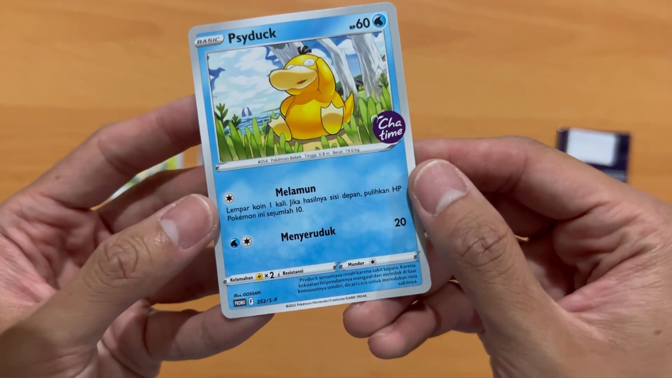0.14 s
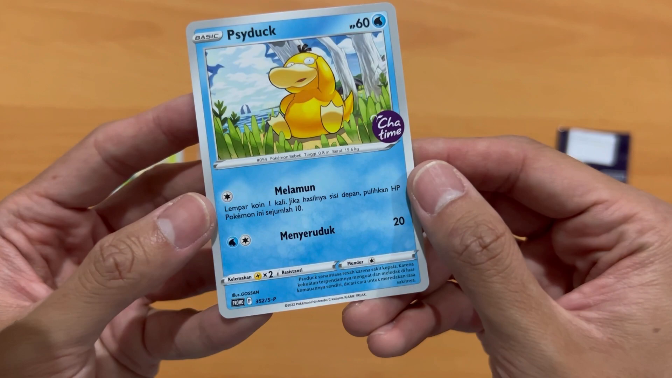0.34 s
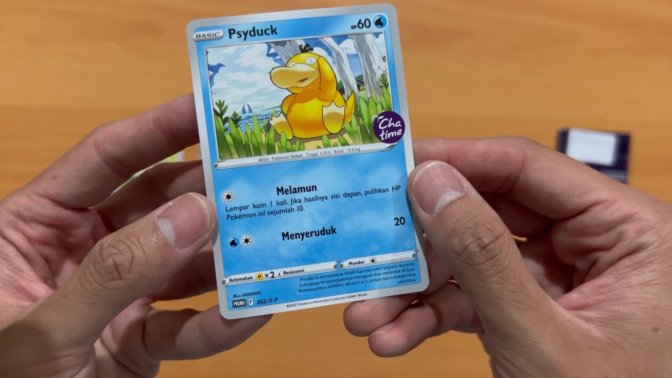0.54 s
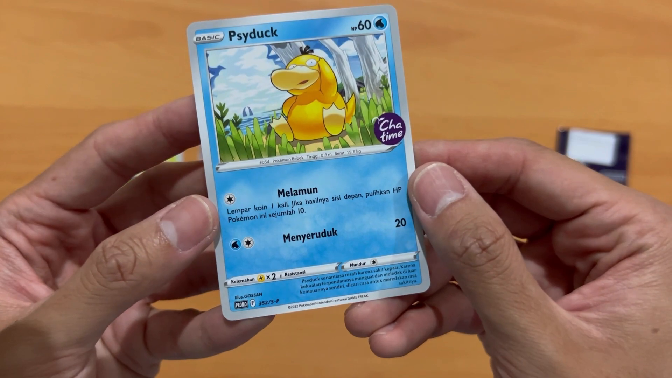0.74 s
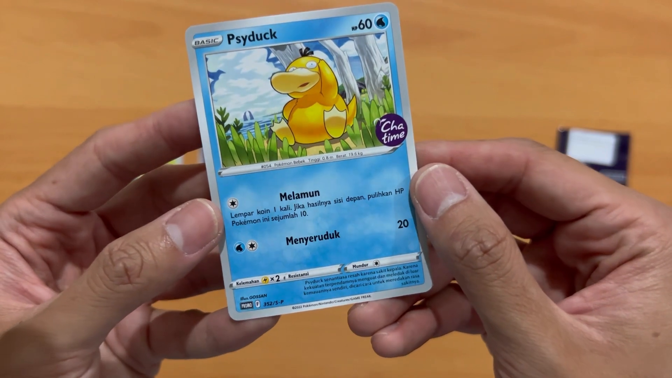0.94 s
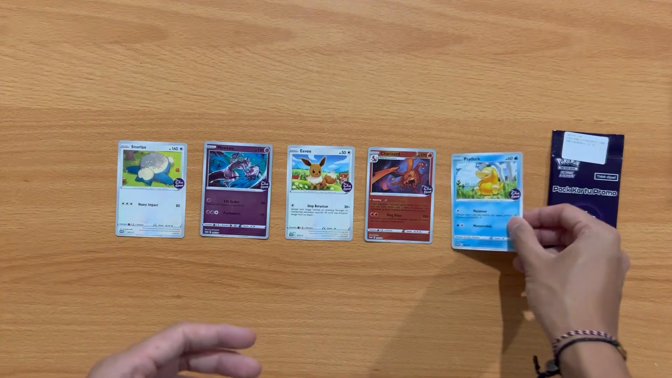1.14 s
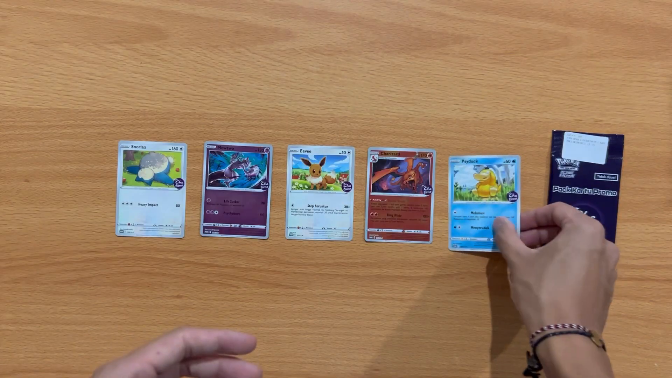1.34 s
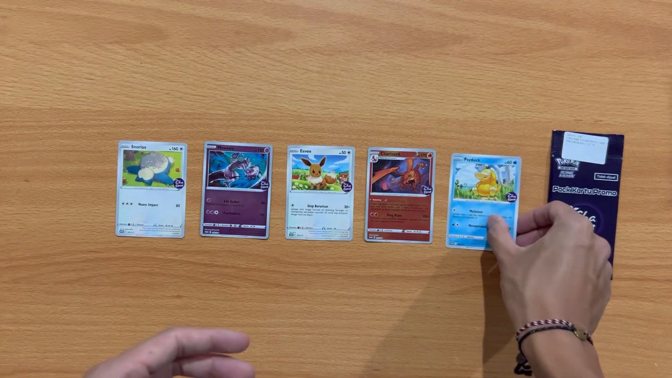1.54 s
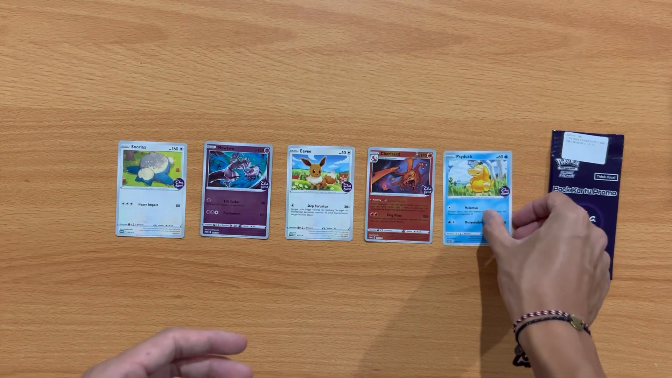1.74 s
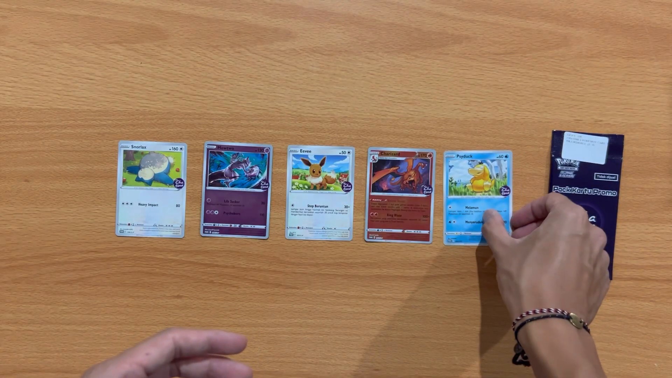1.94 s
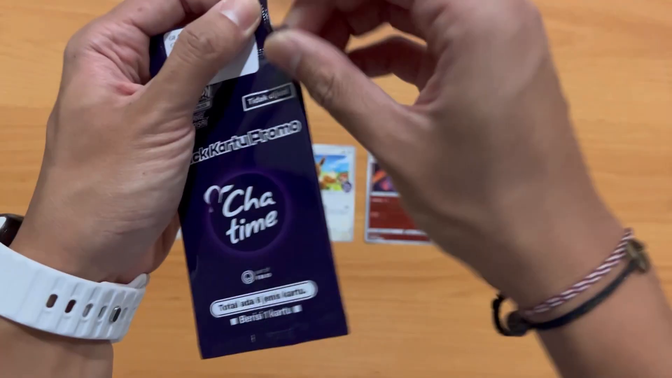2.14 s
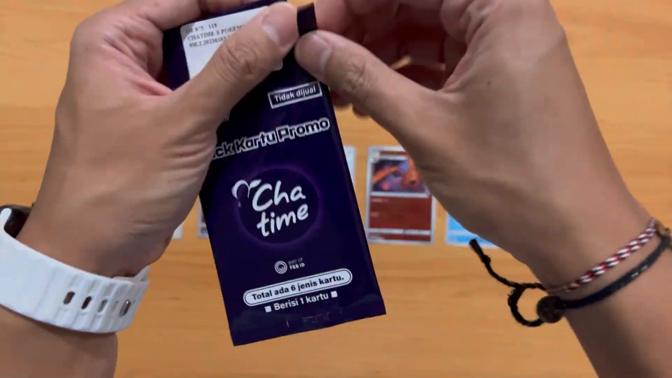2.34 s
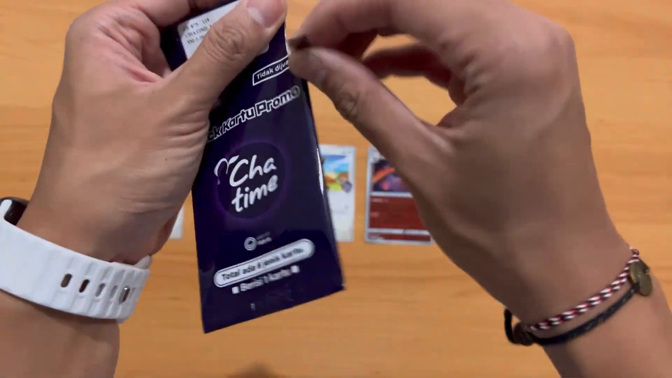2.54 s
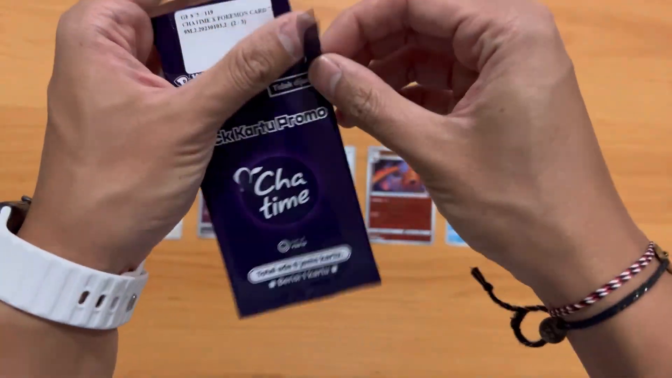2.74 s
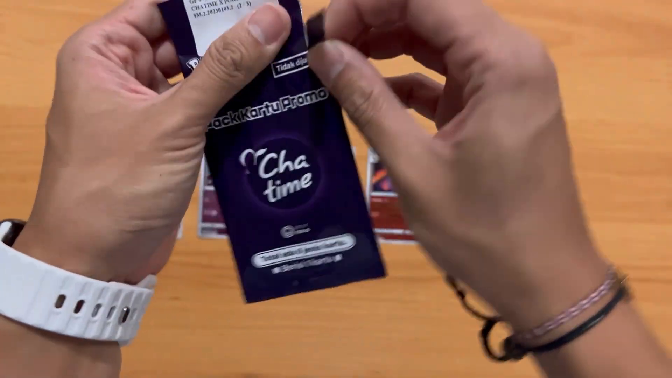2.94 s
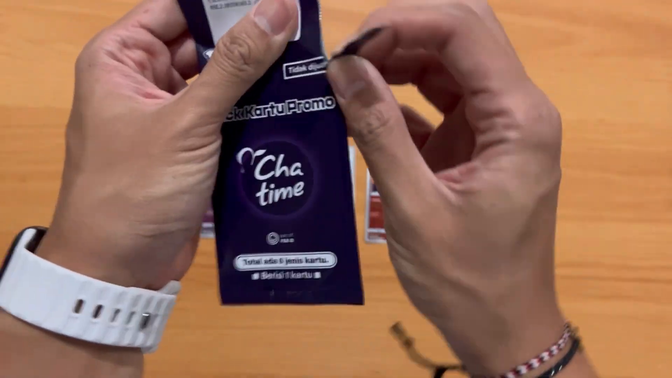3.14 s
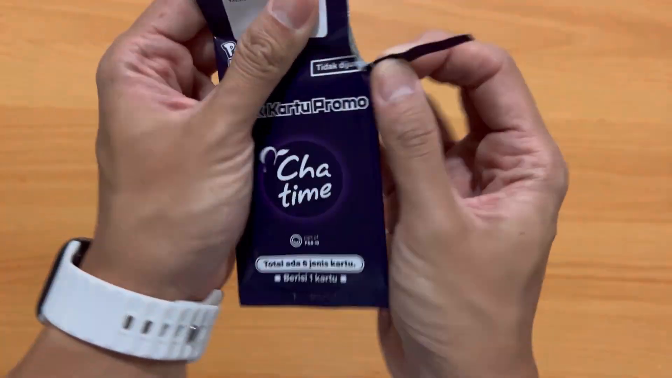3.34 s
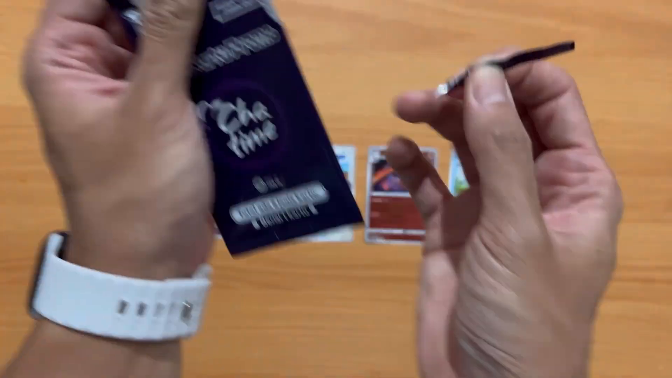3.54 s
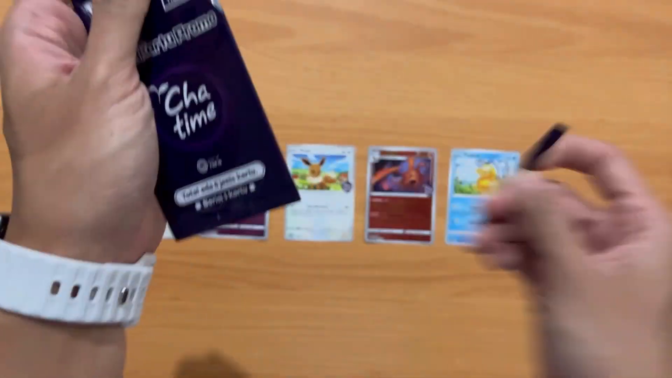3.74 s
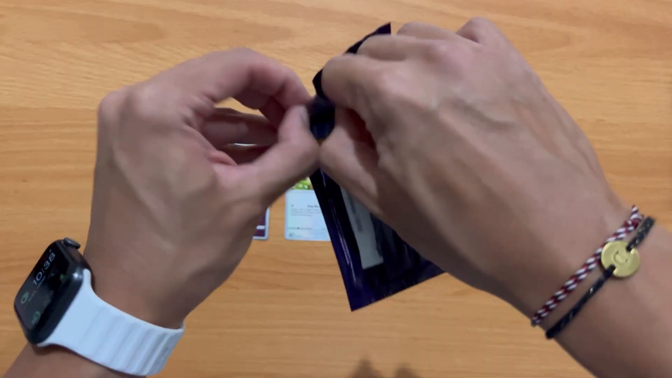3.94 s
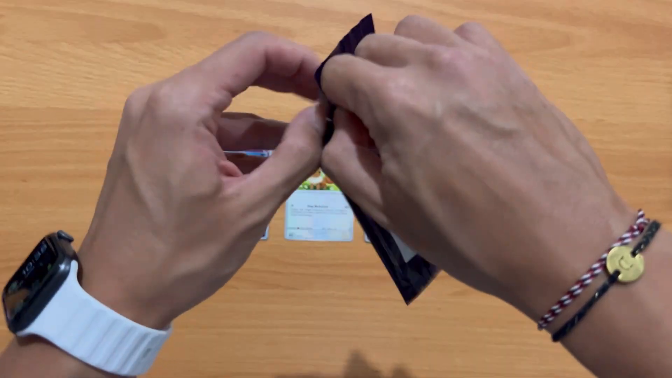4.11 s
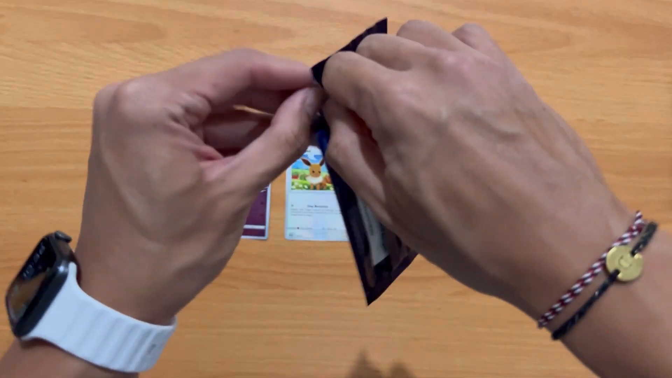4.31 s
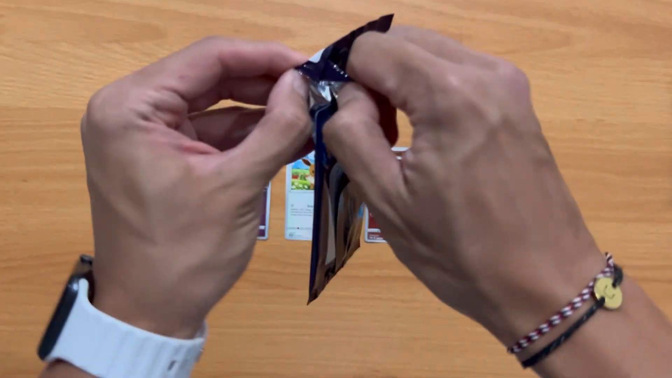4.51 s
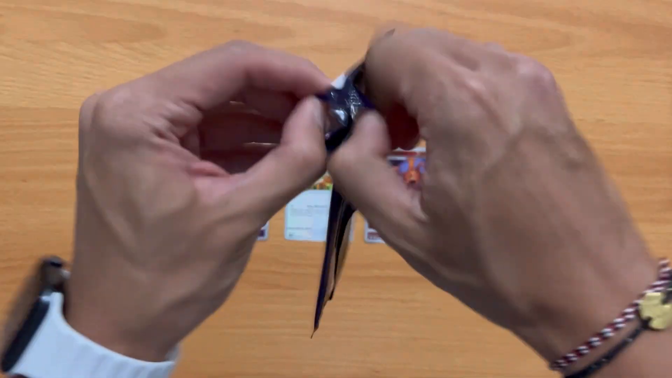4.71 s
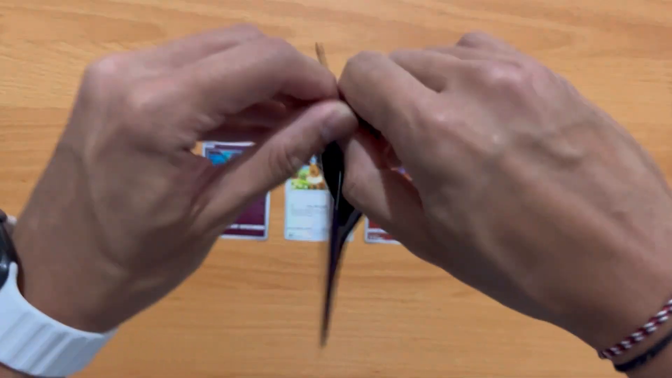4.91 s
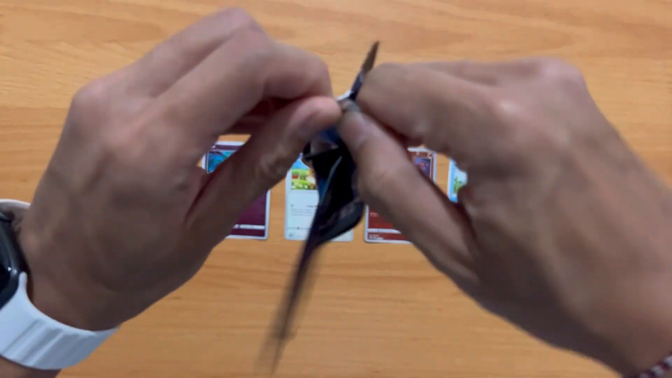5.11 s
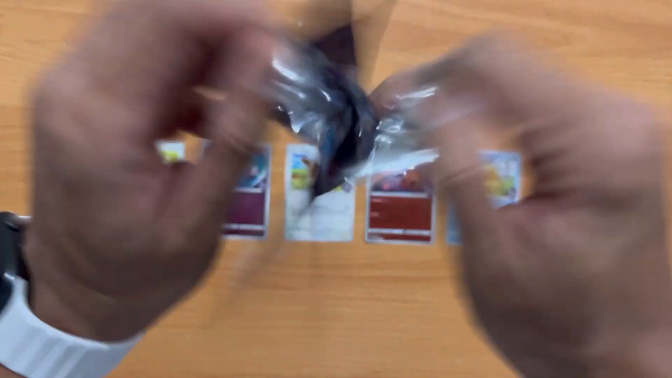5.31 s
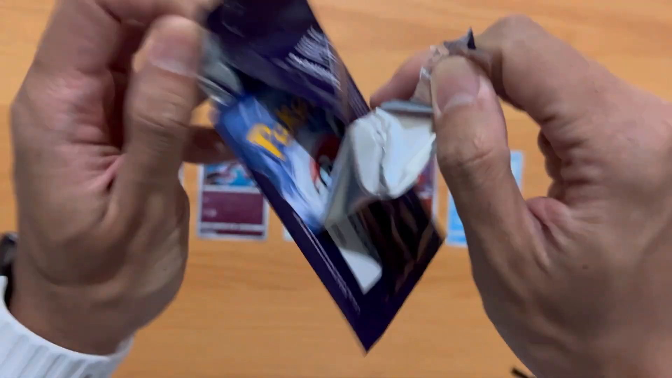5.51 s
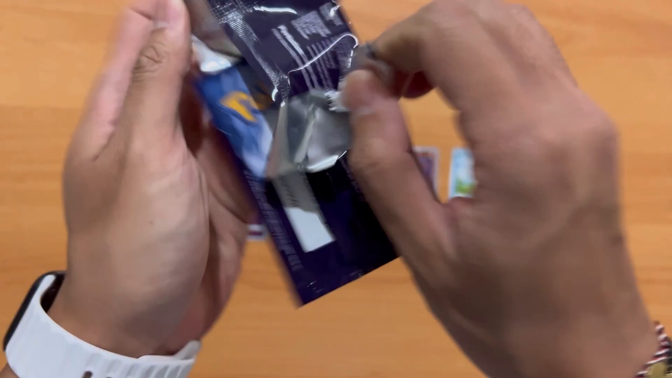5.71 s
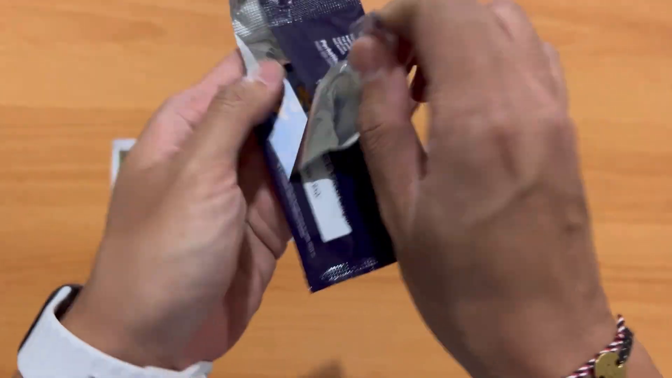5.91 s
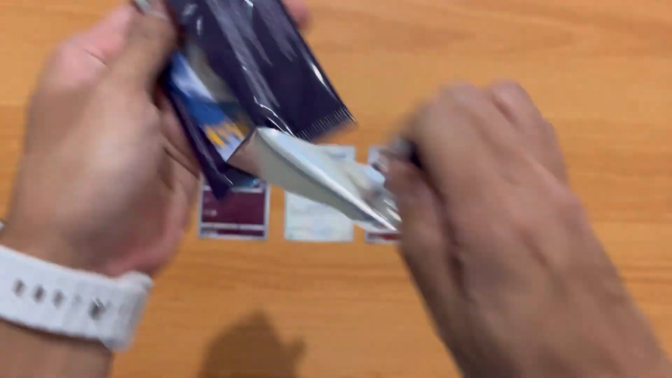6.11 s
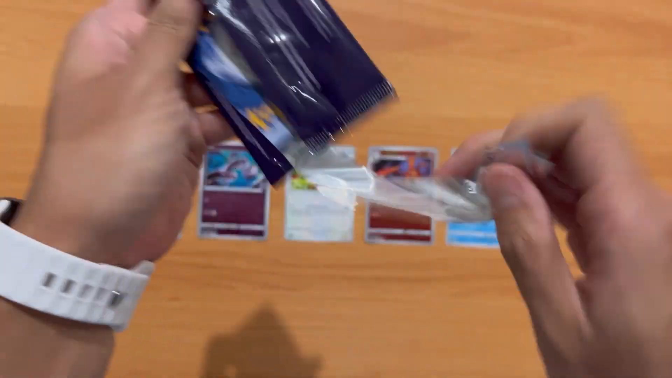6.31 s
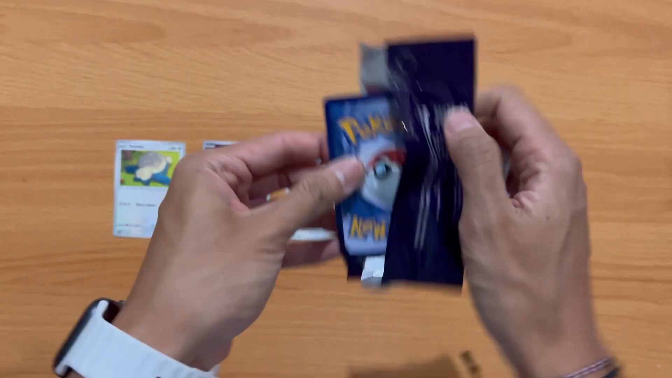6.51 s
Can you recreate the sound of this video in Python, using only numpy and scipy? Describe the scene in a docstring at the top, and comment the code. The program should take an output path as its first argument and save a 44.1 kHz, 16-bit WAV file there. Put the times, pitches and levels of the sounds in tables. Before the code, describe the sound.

Close stereo pickup above a wooden table in a bare room. Soft hum first, then a barely audible card scrape and small flick. Stiff plastic film starts to crackle under fingers, sparse at first, then harder and snappier, with dull flaps of the pouch. A dense rip bursts out, a short lull follows, then vigorous crinkling as a strip comes away. Outside, low traffic rumble and a small engine's distant drone.

```python
"""A bare, quiet room: close by, above a wooden table, hands tear a plastic foil packet open.
Hum comes first; then filtered noise makes a card slide on the table, and random fractures and ringing
creases make the packet crinkle. Its seam gives in one sharp rip, a dense burst of fractures, and the loose
strip is pulled off. Far outside, harmonics of a firing rate make a small engine drone by over street noise.
"""
import sys
import numpy as np
from scipy import signal
from scipy.fft import rfft, irfft, next_fast_len
from scipy.io import wavfile

SR = 44100
rng = np.random.default_rng(int(sys.argv[2]) if len(sys.argv) > 2 else 0)


def dump(signal):
    """Clip the signal to [-1, 1] and save it as 16-bit WAV at the path in sys.argv[1]."""
    limited = np.clip(np.atleast_2d(signal).T, -1, 1)
    pcm = np.round(limited * 32767).astype(np.int16)
    wavfile.write(sys.argv[1], SR, pcm)


N = 293706

# Spectra below are shapes: each sound is scaled to rms 1 before its own level is applied.
# room hum at first: (f/Hz, density/dB per Hz)
HUM_SPECTRUM = [(70, -5.5), (108, 1.5), (160, -13.5), (300, -15), (500, -26), (780, -30.5), (1260, -25),
                (2350, -37.5), (3600, -50), (16000, -67)]
# room air afterwards: (f/Hz, density/dB per Hz)
AIR_SPECTRUM = [(100, 16), (500, -11), (1600, 5.5), (3000, -14), (8000, -41), (12000, -29), (16000, -14)]
# a thin steady whine in the room: (f/Hz, density/dB per Hz)
WHINE_SPECTRUM = [(3700, -57), (4110, -21), (4195, 8), (4290, -29), (4700, -53)]
HUM_DB, HUM_RUMBLE_DB = -57, -55  # the hum and the rumble under it
HUM_END_S, HUM_HANDOVER_S = 1.1, .02  # middle and duration of the passage from hum to thinner air
AIR_DB, AIR_RISE_DB_PER_S = -76.5, 1.9  # level at HUM_END_S and its steady rise

# street outside, before the overall gains: (t/s, rumble level/dB, drone level/dB)
STREET_LEVELS = [(1.12, -65, -72.5), (1.52, -68.5, -77.5), (2.12, -61.5, -75.5), (2.54, -55, -67),
                 (3.16, -60.5, -67.5), (3.19, -52.5, -69), (3.82, -50, -67), (4.19, -49.5, -56.5),
                 (4.65, -52.5, -59.5), (5.87, -47, -57.5), (6.66, -57.5, -56.5)]
# street rumble, also used under the hum: (f/Hz, density/dB per Hz)
RUMBLE_SPECTRUM = [(15, -46), (28, -9), (40, 15), (49, 14), (58, 23.5), (68, 7), (85, 0), (130, -43)]
# street drone: (f/Hz, density/dB per Hz)
DRONE_SPECTRUM = [(60, -21), (105, 2), (140, -3), (195, -1), (270, -8), (400, -13.5), (700, -26.5),
                  (1500, -32.5)]

# the card is pushed over the wood: (start t/s, length t/s, level/dB, brightness/dB per octave)
CARD_PUSHES = [(1.097, 0.19, -75, -5.5), (1.444, 0.29, -77.5, 2)]
# card on wood, before the brightness tilt: (f/Hz, density/dB per Hz)
CARD_SPECTRUM = [(1200, -14), (2200, 2), (3300, -7), (4000, -1), (4300, 7), (4700, -6.5), (9000, -29),
                 (12000, -12), (16000, -13)]
# card edge slipping from the finger: (f/Hz, density/dB per Hz)
EDGE_SPECTRUM = [(2000, -16), (4300, -11), (6000, 7), (8000, -11), (12000, -11), (16000, -11)]
PUSH_ATTACK_S, PUSH_RELEASE_S = .08, .04
FLICK_S, FLICK_DB, FLICK_FADE_S = 1.717, -52, 0.0066  # the finger slips off the edge

# fingers take hold and work the film: (start t/s, length t/s, effort level/dB before the layer gain)
FINGER_GRIPS = [(2.129, 0.081, -50.5), (2.37, .13, -50.5), (2.58, 0.44, -59), (3.109, 0.065, -55),
                (3.429, .05, -52), (3.869, 0.31, -46), (4.289, 0.2, -45), (4.531, 0.23, -49.5),
                (4.791, .2, -49), (5.07, .16, -48.5), (5.33, 0.14, -49), (5.6, .12, -47),
                (5.88, 0.096, -48.5), (6.019, .18, -43), (6.298, 0.32, -51)]
# film slides on film: (centre t/s, half length t/s, level/dB before the layer gain)
FILM_RUBS = [(3.47, 0.011, -45), (3.905, 0.02, -51), (3.936, 0.044, -39.5), (4.358, 0.029, -39.5),
             (4.457, 0.012, -42.5), (4.85, 0.011, -41.5), (5.174, 0.022, -41), (5.972, 0.044, -44),
             (6.081, 0.022, -34.5), (6.2, 0.013, -39.5), (6.317, 0.019, -45)]
# fine crackle: (f/Hz, density/dB per Hz)
FILM_SPECTRUM = [(150, 2.5), (400, -4), (1000, 0), (3000, 4), (6000, -3.5), (9500, 1.5), (12000, -1),
                 (16000, -7.5)]
GRIP_ATTACK_S, GRIP_RELEASE_S = .02, 0.028
RIP_S, RIP_LENGTH_S, RIP_DB = 5.272, .06, -24  # the seam parts
RIP_ATTACK_S, RIP_RELEASE_S = 0.02, .015  # the tear gathers speed, then runs out

# loudest creases buckling:
# (t/s, level/dB before the layer gain, thud over crack level/dB, fizz over crack level/dB)
CREASES = [(2.1346, -44, -10.5, -21), (2.1788, -39, -6.5, -6), (2.1872, -42.5, -5, 2),
           (2.1966, -39.5, -13, -13), (2.2177, -35.5, -5, -2), (2.3765, -35, -16, -10),
           (2.4131, -34.5, -9.5, 5), (2.4372, -31.5, -11, 4.5), (2.4815, -40, -7, 3),
           (2.5606, -37, -12, 13), (2.5995, -41, -8.5, -6.5), (2.6524, -42.0, -5, -14),
           (2.7064, -43.5, -14, 4), (2.7343, -34, -18, 1.5), (2.8547, -41.5, -3, 1),
           (2.9521, -41.5, -16, -16), (2.9849, -43.5, -6, -9), (3.039, -27.5, -16, 1.5),
           (3.0974, -35.5, -2, 15), (3.1512, -32.5, -20, 12.5), (3.3087, -49, -5.5, -10),
           (3.357, -47.5, 3.5, -6), (3.4127, -25.5, -6, 12.5), (3.4315, -24.5, -10, 15),
           (3.4677, -38, 3.5, -1), (3.4737, -31.5, -4.5, -3), (3.6841, -43.5, -5.5, 5),
           (3.9046, -32.5, -11, 4.5), (3.9192, -22.0, -15, 12.5), (3.939, -22.5, -18, 1.5),
           (4.0703, -30.5, -4, 4), (4.0832, -32.5, -23, -3), (4.2995, -26.5, -4, 17.5),
           (4.332, -24.5, -18, 8.5), (4.3508, -29.0, -15, 5), (4.3611, -28.5, -21, 4),
           (4.4026, -34.5, -10, 13), (4.4652, -28.5, -17, 9), (4.5801, -31.5, -5, 16),
           (4.6612, -37.0, -7, -1), (4.676, -33, -8.5, -2), (4.7125, -31, -4.5, 4),
           (4.8299, -32.5, -7.5, 0.5), (4.9316, -35.5, -3, 14), (5.0439, -39, 1, 16),
           (5.1039, -38, -15, -1), (5.1138, -36, -3.5, 6), (5.1335, -30.5, -6, 14), (5.1705, -28, -8, 19),
           (5.1939, -35, -15, -2), (5.2845, -20.5, -8, 2), (5.2936, -18.5, -15.5, -14),
           (5.3036, -16.5, -13, 2), (5.3134, -21, -6, 5), (5.3234, -20, -8, -4), (5.329, -18, -7.5, -2.5),
           (5.3609, -28, -5, -5), (5.4433, -30, -15, -4), (5.6836, -39.5, -2, -4.5), (5.882, -32.5, -2, 11),
           (5.9211, -34.5, -10, -10), (6.0202, -27, -16, -2), (6.0485, -24, -16, -1),
           (6.0569, -26.5, -13, 4), (6.0654, -23, -8, 1), (6.0838, -19.5, -7, 3), (6.125, -21.5, -7.5, 1.5),
           (6.1643, -27.5, 1.5, 2), (6.2057, -23.5, -7, 13), (6.3405, -34, -4, 8),
           (6.4398, -35.0, -15.5, -3), (6.4736, -40, 2, -1), (6.5631, -37.0, -3.5, -7),
           (6.6534, -25.0, -10, 5.5)]
# thud, crack and fizz of a crease: (low f/Hz, high f/Hz, facet decay t60/s)
CREASE_BANDS = [(257, 1351, 0.016), (1272, 6745, 0.011), (7440, 15160, 0.012)]
TICK_DB, TICK_SCATTER_DB = 3, 3  # lesser creases: strength over the effort, and its spread
TICK_THUD_DB, TICK_FIZZ_DB, TICK_COLOUR_DB = -8, 5, 7.5  # thud and fizz over crack; spread of both

# the whole packet jerks: (t/s, level/dB before the envelope)
PACKET_JERKS = [(2.498, -41.5), (2.618, -46.5), (2.848, -47), (3.468, -33.5), (4.068, -39.5), (5.31, -36.5),
                (5.33, -27), (6.085, -44), (6.128, -41), (6.167, -33.5), (6.562, -36)]
# its dull flap: (f/Hz, density/dB per Hz)
POUCH_SPECTRUM = [(40, 5), (120, 6), (300, 4.5), (450, 6.5), (900, -59), (2500, -47)]

# the far engine: (t/s, firing rate f/Hz, level/dB)
ENGINE_PASS = [(3.8, 31.1, -73), (3.97, 31.5, -48.5), (4.4, 31.7, -58.5), (4.9, 32.9, -50), (5.7, 34, -51),
               (6.2, 34.45, -45), (6.66, 34.5, -47)]
# resonances that shape the exhaust as heard indoors: (f/Hz, level/dB)
EXHAUST_RESPONSE = [(30, -32), (67, -2.5), (100, -43), (135, -44), (162, -15), (172, 0.5), (186, -6.5),
                    (197, 4), (208, -5.5), (240, -6), (275, -15), (310, -7), (400, -18), (600, -27)]

# sound scattered off the hands, against the direct sound: (f/Hz, level/dB)
SCATTER_RESPONSE = [(100, -12), (500, -8), (1500, -6), (3300, -5), (5000, -1), (7000, -7), (9500, -13),
                    (16000, -11)]
# reverberation before the early boost: (f/Hz, t60/s)
ROOM_DECAY = [(200, 0.91), (600, 0.7), (1500, 1.6), (4000, 1.05), (10000, 0.95), (16000, 0.23)]
# colour of the echo: (f/Hz, level/dB)
WALL_RESPONSE = [(150, 7), (700, 4), (2500, 2.5), (5000, 7), (7500, 6), (9000, 0.5), (12000, -0.5),
                 (16000, 5)]
# diffuse field at the two ports: (f/Hz, left-right correlation)
PORT_CORRELATION = [(100, .9), (1500, .6), (3300, .45), (5000, 0), (7000, .45), (9300, .88), (12000, .88),
                    (15000, .7)]

# resonances of the microphone ports: (f/Hz, level/dB)
PORT_RESONANCES = [(7500, 0), (9400, -6), (11800, 2.5), (14200, 0), (15500, 1.5)]
# phase by which left leads right: (f/Hz, phase/rad)
PORT_PHASE = [(20, 0), (2000, -.3), (4000, -1.1), (6000, 0), (7600, .4), (8400, 1.3), (9400, 3.1),
              (12000, 6.3), (14200, 9.4), (16000, 11.1)]
# left over right: (f/Hz, level difference/dB)
PORT_BALANCE = [(60, 2.5), (200, -3), (600, -2), (2500, -1.5), (4500, -2.5), (7000, -2.5), (10000, -1),
                (16000, 1)]
TOP_HZ = 16400  # band limit
CEILING = .8  # peaks are rounded off towards this share of full scale


def amp(db):
    """Level definition: decibels to amplitude gain."""
    return 10 ** (np.asarray(db) / 20)


def unit(x):
    """Normalisation: scale a signal to rms 1."""
    return x / np.sqrt(np.mean(x ** 2) + 1e-20)


def along(points, hz):
    """Interpolation of (f/Hz, value) points on a logarithmic frequency axis."""
    f, v = np.transpose(points)
    return np.interp(np.log(hz + 1), np.log(f + 1), v)


def level(rows, axis=1):
    """Level history: one gain per sample from a dB column, all but silent outside its rows."""
    rows = np.asarray(rows)
    return amp(np.interp(np.arange(N) / SR, rows[:, 0], rows[:, axis], left=-120, right=-120))


def strokes(rows, attack_s, release_s):
    """Motion envelope: (start s, length s, dB) moves that each rise, hold and die away exponentially."""
    t = np.arange(N) / SR
    gain = np.zeros(N)
    for s, length, db in rows:
        rise = np.clip((t - s) / attack_s, 0, 1)
        gain += amp(db) * rise * np.exp(-np.maximum(t - s - length, 0) / release_s)
    return gain


def filtered(x, response):
    """Linear filtering: multiply the spectrum of x by a response of frequency."""
    n = x.shape[-1]
    padded = next_fast_len(n + 8192)
    hz = np.fft.rfftfreq(padded, 1 / SR)
    return irfft(rfft(x, padded) * response(hz), padded)[..., :n]


def coloured(x, spectrum):
    """Spectral shaping: x given a spectrum, at rms 1."""
    return unit(filtered(x, lambda hz: amp(along(spectrum, hz))))


def diffuse(pair):
    """Diffuse-field coherence: two unrelated signals mixed to the correlation found at the two ports."""
    def rotation(hz):
        angle = np.arccos(np.clip(along(PORT_CORRELATION, hz), -1, 1)) / 2
        return np.array([np.cos(angle), np.sin(angle)])
    mid, side = filtered(pair, rotation)
    return np.array([mid + side, mid - side])


def rush(spectrum):
    """Stationary diffuse noise in stereo, at rms 1."""
    return coloured(diffuse(rng.standard_normal((2, N))), spectrum)


def add(track, s, sound):
    """Superposition: mix a sound into the track at s seconds."""
    start = max(round(s * SR), 0)
    part = track[..., start:start + sound.shape[-1]]
    part += sound[..., :part.shape[-1]]


def background(rumble_db, drone_db, whine_db):
    """Noise fields: hum at first; then street rumble through the walls, and air with its whine."""
    since = np.arange(N) / SR - HUM_END_S
    air_share = np.clip(since / HUM_HANDOVER_S + .5, 0, 1)
    hum = amp(HUM_DB) * rush(HUM_SPECTRUM) + amp(HUM_RUMBLE_DB) * rush(RUMBLE_SPECTRUM)
    street = amp(rumble_db) * level(STREET_LEVELS) * rush(RUMBLE_SPECTRUM)
    street += amp(drone_db) * level(STREET_LEVELS, axis=2) * rush(DRONE_SPECTRUM)
    air = amp(AIR_DB + AIR_RISE_DB_PER_S * since) * rush(AIR_SPECTRUM)
    air += amp(AIR_DB + whine_db) * rush(WHINE_SPECTRUM)
    return (1 - air_share) * hum + air_share * air + street


def card():
    """Sliding friction: a card hisses over wood, brighter on the second push; its edge slips off the finger."""
    flick = amp(FLICK_DB) * np.exp(-np.abs(np.arange(N) / SR - FLICK_S) / FLICK_FADE_S)
    out = flick * coloured(rng.standard_normal(N), EDGE_SPECTRUM)
    for *push, tilt_db in CARD_PUSHES:
        colour = [(hz, db + tilt_db * np.log2(hz)) for hz, db in CARD_SPECTRUM]
        hiss = coloured(rng.standard_normal(N), colour)
        out += strokes([push], PUSH_ATTACK_S, PUSH_RELEASE_S) * hiss
    return out


def crackle(rate, spread_db, ring_s):
    """Random impulse process: tiny fractures, mostly weak and a few strong, in the colour of the film."""
    occurs = rng.random(N) < rate / SR  # rate is fractures a second
    sizes = amp(spread_db * np.minimum(rng.exponential(size=N), 3.5)) * occurs
    # each fracture's energy decays exponentially
    energy = signal.lfilter([1], [1, -np.exp(-2 / (ring_s * SR))], sizes ** 2)
    return coloured(np.sqrt(energy) * rng.standard_normal(N), FILM_SPECTRUM)


def crinkling(effort, grip_db, rub_db):
    """Fracture density: sparse crackle under the fingers, denser where film slides, densest in the rip."""
    t = np.arange(N) / SR
    rubbing = sum(amp(db) * np.exp(-((t - s) / half) ** 2) for s, half, db in FILM_RUBS)
    parting = strokes([(RIP_S, RIP_LENGTH_S, RIP_DB)], RIP_ATTACK_S, RIP_RELEASE_S)
    grip = amp(grip_db) * effort * crackle(rate=330, spread_db=4.8, ring_s=.0011)
    rub = amp(rub_db) * rubbing * crackle(rate=1800, spread_db=3.4, ring_s=.001)
    rip = parting * crackle(rate=2000, spread_db=3.5, ring_s=0.00082)
    return grip + rub + rip


def ticks(count=8):
    """Buckling under load: each grip pops lesser creases at random moments, their level following the effort."""
    creases = []
    for start, length, effort_db in FINGER_GRIPS:
        for _ in range(count):
            s = start + length * rng.random()
            db = effort_db + TICK_DB + TICK_SCATTER_DB * rng.standard_normal()
            thud_db = TICK_THUD_DB + TICK_COLOUR_DB * rng.standard_normal()
            fizz_db = TICK_FIZZ_DB + TICK_COLOUR_DB * rng.standard_normal()
            creases.append((s, db, thud_db, fizz_db))
    return creases


def snaps(creases, crack_s, crack_db, table_db, gain_db):
    """Snap-through buckling: a brief noise pop rings the facets around it, new in size every time."""
    out, t = np.zeros(N), np.arange(SR // 50) / SR
    window = .005 * SR  # level refers to the energy spread over 5 ms
    filters = [signal.butter(2, [low_hz, min(high_hz, .45 * SR)], "band", fs=SR)
               for low_hz, high_hz, _ in CREASE_BANDS]
    for s, db, thud_db, fizz_db in creases:
        snap = np.zeros(len(t))
        shares = amp([thud_db, 0, fizz_db])
        shares = shares / np.linalg.norm(shares)
        for (low_hz, high_hz, t60), band, share in zip(CREASE_BANDS, filters, shares):
            place, phase, size = rng.random((3, 36, 1))  # 36 facet modes
            hz = low_hz + place * (high_hz - low_hz)
            facets = unit(np.sum(size ** 2 * np.sin(2 * np.pi * (hz * t + phase)), 0))
            pop = amp(crack_db) * rng.standard_normal(len(t)) * (t / crack_s) * np.exp(-t / crack_s)
            ring = signal.lfilter(*band, pop + facets * amp(-60 * t / t60))
            snap += amp(db + gain_db) * share * ring * np.sqrt(window / np.sum(ring ** 2))
        add(out, s, snap)
        add(out, s + rng.uniform(.0025, .0055), amp(table_db) * snap)  # back off the table top
    return out


def flaps(t60):
    """Air displacement: when the film lets go, the pouch jerks and pushes a dull, decaying puff."""
    out, t = np.zeros(N), np.arange(SR // 6) / SR
    for s, db in PACKET_JERKS:
        envelope = amp(db - 60 * t / t60) * (1 - np.exp(-t / 0.0023))
        add(out, s, envelope * coloured(rng.standard_normal(len(t)), POUCH_SPECTRUM))
    return out


def engine(waver_db, count=16):
    """Harmonic series: multiples of the firing rate climb through resonances, each wavering in level."""
    s, rate_hz, _ = np.transpose(ENGINE_PASS)
    hz = np.interp(np.arange(N) / SR, s, rate_hz)
    cycles, out = np.cumsum(hz) / SR, np.zeros(N)
    for k in range(1, count + 1):
        waver = np.interp(np.arange(N), np.linspace(0, N, 40), rng.standard_normal(40))
        gain = amp(along(EXHAUST_RESPONSE, k * hz) + waver_db * waver)
        out += gain * np.sin(2 * np.pi * (k * cycles + rng.random()))
    return level(ENGINE_PASS, axis=2) * unit(out)


def hands(x, fade_s, count=130):
    """Scattering off hands and packet: short paths, unlike at each port, drawn afresh for each equal stretch."""
    t, scattered = np.arange(SR // 100) / SR, np.zeros((2, N))
    for part in np.array_split(np.arange(N), count):
        paths = rng.standard_normal((2, len(t))) * t * np.exp(-t / fade_s)
        paths = paths / np.linalg.norm(paths, axis=1, keepdims=True)
        add(scattered, part[0] / SR, signal.fftconvolve(x[None, part], paths, axes=1))
    return x + filtered(scattered, lambda hz: amp(along(SCATTER_RESPONSE, hz)))


def room(x, early_db, early_s, count=10):
    """Reverberation: bare walls give a dense early answer and a long bright tail, redrawn each equal stretch."""
    out = np.zeros((2, N))
    for part in np.array_split(np.arange(N), count):
        hz, t, cells = signal.stft(diffuse(rng.standard_normal((2, SR))), SR, nperseg=256)
        decay = amp(-60 * t / along(ROOM_DECAY, hz)[:, None])
        decay = decay * (1 + amp(early_db) * np.exp(-t / early_s))
        colour = amp(along(WALL_RESPONSE, hz))[:, None]
        tail = signal.istft(cells * decay * colour, SR, nperseg=256)[1]
        tail = tail * (1 - np.exp(-np.arange(tail.shape[1]) / SR / 0.0018))  # soft onset
        tail = tail / np.linalg.norm(tail[0])
        add(out, part[0] / SR, signal.fftconvolve(x[None, part], tail, axes=1))
    return out


def scene():
    """Superposition: the hands' sounds, near and reverberant, over the room and the street outside."""
    far = background(rumble_db=0.5, drone_db=5, whine_db=-10.5) + engine(waver_db=3.0)
    effort = strokes(FINGER_GRIPS, GRIP_ATTACK_S, GRIP_RELEASE_S)
    near = card() + crinkling(effort, grip_db=-3, rub_db=-1.0)
    near += snaps(list(CREASES) + ticks(), crack_s=0.00024, crack_db=15.5, table_db=-14.5, gain_db=-1.0)
    near += flaps(t60=0.073)
    return hands(near, fade_s=0.00091) + amp(-9.5) * room(near, early_db=-5, early_s=0.03) + far


def record(dry):
    """Transduction: two ports colour the treble and differ in phase and level; peaks round, band is limited."""
    def ports(hz):
        # left takes half of the level and phase difference, right the inverse half
        half = amp(along(PORT_BALANCE, hz) / 2) * np.exp(1j * along(PORT_PHASE, hz) / 2)
        return amp(along(PORT_RESONANCES, hz)) * np.array([half, 1 / half])
    heard = filtered(dry, ports)
    rounded = heard / (1 + (heard / CEILING) ** 4) ** (1 / 4)
    return filtered(rounded, lambda hz: 1 / (1 + (hz / TOP_HZ) ** 100))


dry = scene()
out = record(dry)
dump(out)
```